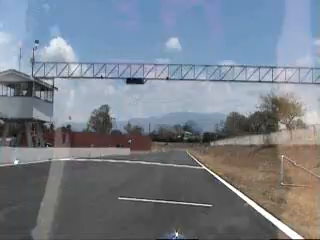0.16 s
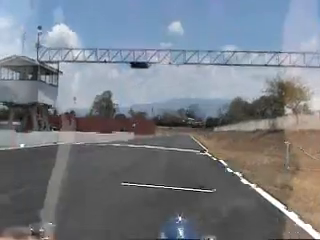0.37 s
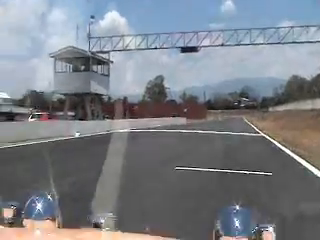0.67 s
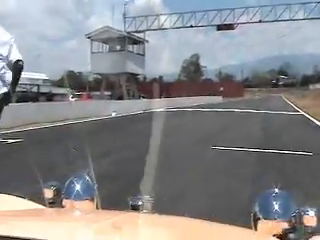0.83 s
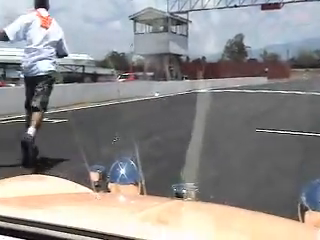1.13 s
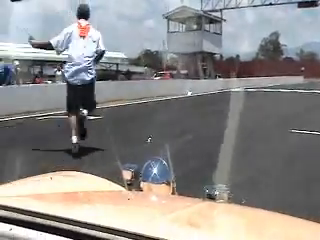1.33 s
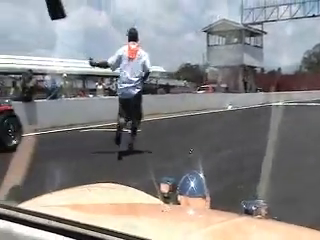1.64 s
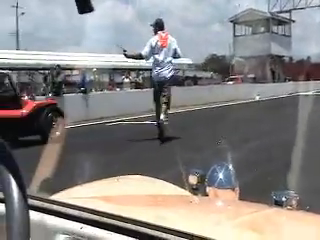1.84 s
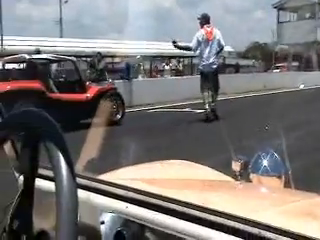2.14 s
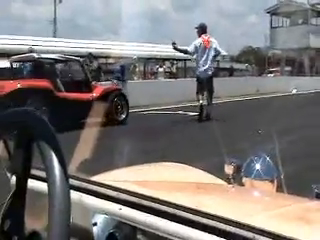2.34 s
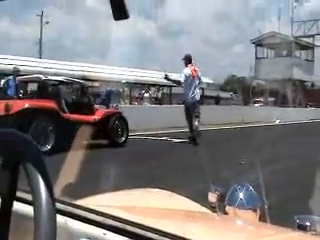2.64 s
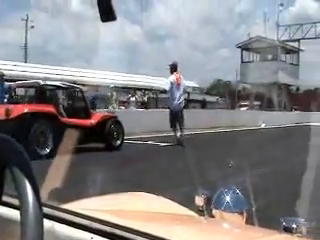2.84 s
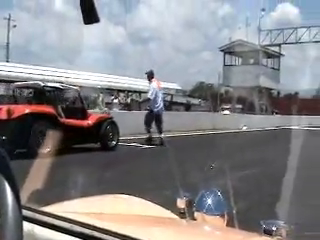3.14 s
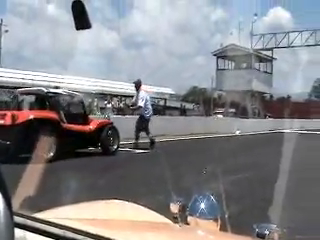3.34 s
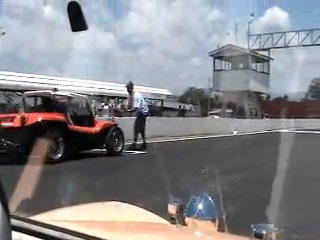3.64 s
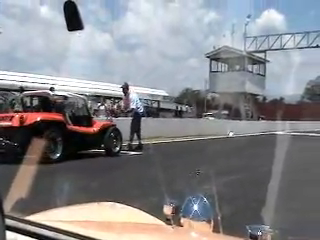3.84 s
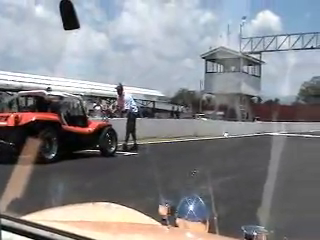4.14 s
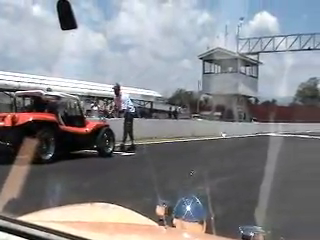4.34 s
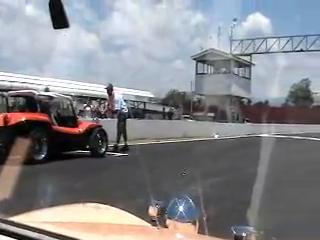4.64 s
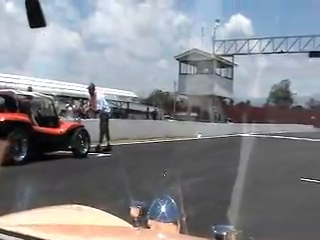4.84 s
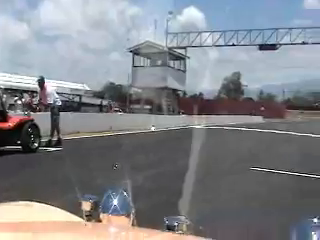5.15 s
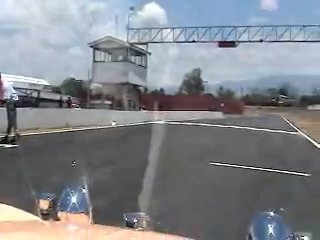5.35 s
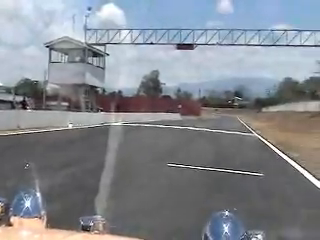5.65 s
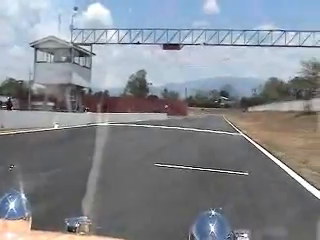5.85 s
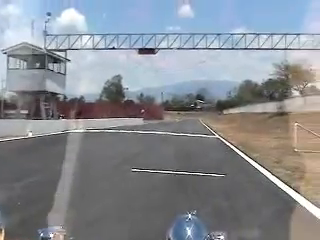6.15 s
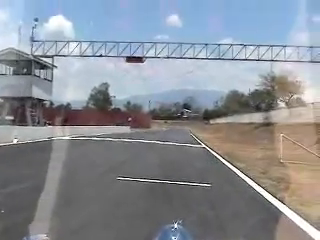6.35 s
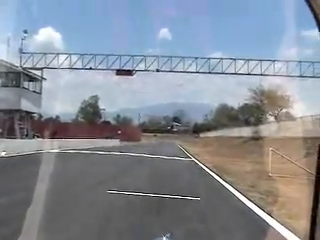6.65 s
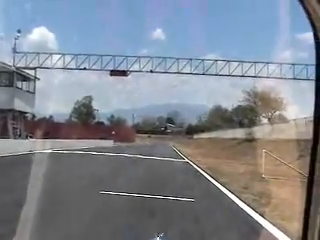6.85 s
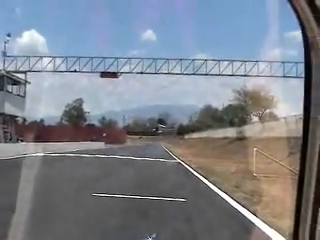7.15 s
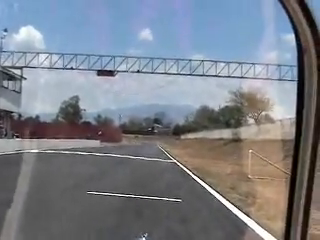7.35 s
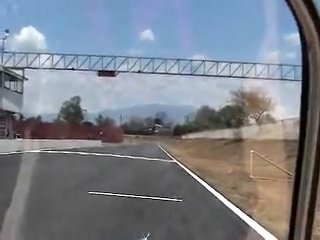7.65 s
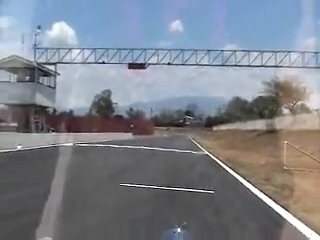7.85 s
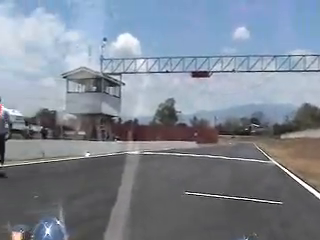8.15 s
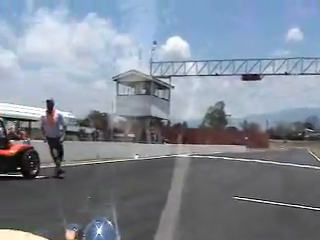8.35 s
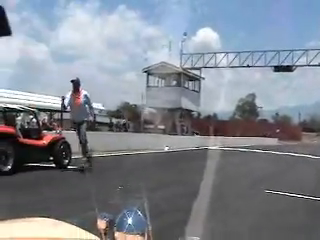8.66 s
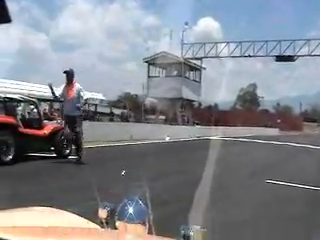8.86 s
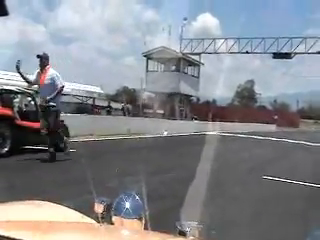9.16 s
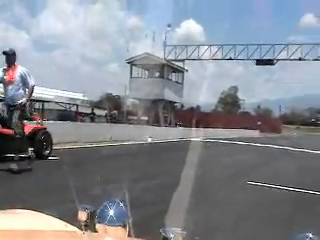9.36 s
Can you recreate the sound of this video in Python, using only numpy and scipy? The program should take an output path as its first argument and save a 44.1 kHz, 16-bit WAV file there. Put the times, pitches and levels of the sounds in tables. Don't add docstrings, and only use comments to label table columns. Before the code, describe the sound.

Close stereo microphones in an open buggy pick up a lumpy, low idle with alternating loud and soft exhaust beats, metallic ringing, light ticking and airy tin rattle. Low wind and a faint second engine throb lie beneath. The opening is silent; the idle then holds steady until one short, loud rev with crackling pops, followed by a falling whine and slowing engine.

```python
import sys
import numpy as np
from scipy import signal
from scipy.fft import rfft, irfft, next_fast_len
from scipy.io import wavfile
from scipy.ndimage import map_coordinates

SR = 44100
rng = np.random.default_rng(int(sys.argv[2]) if len(sys.argv) > 2 else 0)


def boost_factor(decibels):
    exponent = np.asarray(decibels, float) / 20
    return 10 ** exponent


def master_out(mix):
    frames = np.transpose(np.atleast_2d(mix))
    ceiling = np.clip(frames, -1, 1)
    pcm = np.round(ceiling * 32767).astype(np.int16)
    wavfile.write(sys.argv[1], SR, pcm)


N = 418709

IDLE_HZ, REV_SPAN_HZ = 16.85, 5.5
OPEN_S, OPENING_S, SHUT_S, SHUTTING_S = 8.325, 0.05, 8.505, 0.03


def unit(x):
    return x / np.sqrt(np.mean(x ** 2) + 1e-20)


def along(points, hz):
    f, v = np.transpose(points)
    return np.interp(np.log(hz + 1), np.log(f + 1), v)


def wobble(rate):
    knots = rng.standard_normal(int(N * rate / SR) + 4)
    return map_coordinates(knots, [np.arange(N) * rate / SR])


def filtered(x, response):
    m = next_fast_len(N + SR // 2)
    return irfft(rfft(x, m) * response(np.fft.rfftfreq(m, 1 / SR)), m)[..., :N]


def pipe(modes):
    def response(f):
        total = 0
        for k, (centre, width, db) in enumerate(modes):
            damping = 1j * f * width
            total = total + (-1) ** k * boost_factor(db) * damping / (centre * centre - f * f + damping)
        return total
    return response


def level(throttle, fast, idle_db, open_db, speed_db):
    return boost_factor(idle_db + open_db * throttle + speed_db * fast)


def once_a_cycle(turns, place, late_s, scatter_db):
    cycles = 250
    luck = rng.standard_normal((cycles, 2))
    at = np.interp(np.arange(cycles) + place, turns, np.arange(N), right=N + SR)
    near = np.minimum(at, N - 1).astype(int)
    at = np.clip(at + SR * late_s[near] * luck[:, 0], 0, N)
    size = boost_factor(scatter_db[near] * luck[:, 1])
    whole = at.astype(int)
    part = at - whole
    first = np.bincount(whole, size * (1 - part), N + 2)
    second = np.bincount(whole + 1, size * part, N + 2)
    return (first + second)[:N]


def burst(impulses, length_s):
    return signal.lfilter([1], [1, -np.exp(-1 / (SR * length_s))], impulses)


def rattle(turns, channels):
    memory = 18
    steps = int(SR / IDLE_HZ)
    takes = rng.standard_normal((channels, 12, steps))
    age = np.clip(turns, 0, None) / memory
    place = (turns % 1 * steps).astype(int)
    old = age.astype(int)
    fade = age % 1 * np.pi / 2
    return np.cos(fade) * takes[:, old, place] + np.sin(fade) * takes[:, old + 1, place]


# (time [s], four-stroke cycles per second [Hz])
ENGINE_SPEED = [(0.8, 17.004), (1.6, 16.904), (2.4, 16.901), (3.3, 16.861), (4.0, 16.739), (4.8, 16.862),
                (5.5, 16.629), (6.4, 16.651), (7.1, 16.443), (7.8, 16.079), (8.33, 16.128), (8.41, 18.872),
                (8.5, 22.763), (8.57, 21.703), (8.7, 19.902), (8.9, 18.974), (9.2, 17.067), (9.49, 16.529)]


def controls():
    t = np.arange(N) / SR
    times, rates = np.transpose(ENGINE_SPEED)
    rate = np.interp(t, times, rates)
    turns = np.cumsum(rate) / SR - 12.006 + 0.0012 * wobble(9)
    opening = np.clip((t - OPEN_S) / OPENING_S, 0, 1)
    throttle = opening * np.exp(-np.clip(t - SHUT_S, 0, None) / SHUTTING_S)
    return turns, throttle, np.clip((rate - IDLE_HZ) / REV_SPAN_HZ, 0, 1)


# (place in the cycle [0-1], bark level [dB], puff level [dB])
CYLINDER_FIRINGS = [
    (.216, 0, 0),
    (.427, 17.3, 1),
    (.716, -.2, -2),
    (.929, 16.8, -1),
]
# (frequency [Hz], width [Hz], level [dB])
FIRST_BANK = [(67, 111, 2.7), (130, 25, -3.6), (180, 25, -6.1), (285, 74, 2.4), (293, 25, 7.9),
              (491, 68, -9.3), (530, 54, 1.0), (532, 25, 1.1)]
# (frequency [Hz], width [Hz], level [dB])
SECOND_BANK = [(43, 74, -16.4), (108, 25, -16.3), (319, 52, -1.0), (316, 90, -9.0), (341, 25, -2.9),
               (335, 40, -0.2), (473, 25, -27.0), (576, 25, -33.2)]
# (frequency [Hz], width [Hz], level [dB])
TAIL_PIPE = [(211, 8.1, -5.5), (344.6, 31.4, -8), (457, 16, -9), (623.2, 10, 4.5), (672, 12, -2),
             (860, 22.5, -13), (931, 34, -17), (1228, 34, -15)]
# (frequency [Hz], width [Hz], level [dB])
TIN_SHROUD = [(716, 14, 0)]
# (frequency [Hz], width [Hz], level [dB])
BANK_COLLECTOR = [(226.7, 29, 7), (374, 52, -7), (151, 46, -5.5)]


def exhaust(turns, throttle, fast):
    rough = 0.04 + 0.35 * fast
    off_idle = np.clip(fast / 0.3, 0, 1)
    steady = IDLE_HZ * np.arange(N) / SR
    calm = 0.04 * np.ones(N)
    joint = 0.075

    def keep_step(x):
        return np.interp(turns / IDLE_HZ * SR, np.arange(N), x)

    def silencer(hz):
        return 1 / (1 + (86 / (hz + 1)) ** 12) / (1 + (hz / 560) ** 12)

    def banks(hz):
        return silencer(hz) * np.array([pipe(FIRST_BANK)(hz), pipe(SECOND_BANK)(hz)])

    fire = [once_a_cycle(steady, place, 0.0008 * calm, 6 * calm) for place, _, _ in CYLINDER_FIRINGS]
    blows = [boost_factor(bark_db) * p for (_, bark_db, _), p in zip(CYLINDER_FIRINGS, fire)]
    bark = filtered(np.array([blows[0] + blows[2], blows[1] + blows[3]]), banks).sum(axis=0)

    leak = once_a_cycle(steady, joint, 0.0017 * calm, 9 * calm)
    ring = unit(keep_step(filtered(leak, pipe(TAIL_PIPE))))
    ring = filtered(ring, lambda hz: 0.25 + 0.75 / (1 + (hz / 760) ** 30))
    leak = once_a_cycle(turns, joint, 0.001 * rough, 9 * rough)
    ring = ring + boost_factor(-4) * unit(filtered(leak, pipe(TIN_SHROUD)))

    firings = sum(once_a_cycle(turns, k / 4, 0.0008 * rough, 6 * rough) for k in range(4))
    even = filtered(firings, lambda hz: -pipe(BANK_COLLECTOR)(hz) / (1 + 1j * hz / 600) ** 2)

    puffs = sum(boost_factor(puff_db) * p for (_, _, puff_db), p in zip(CYLINDER_FIRINGS, fire))
    puffs = keep_step(burst(puffs, 0.0074))
    boom = np.sqrt(2) * np.cos(2 * np.pi * 4 * (turns + 0.06)) * boost_factor(0.37 * wobble(13))

    out = level(throttle, fast, -16.9, 3, 2.5) * boom
    out = out + level(throttle, fast, -14.5, 3.1, -13) * unit(keep_step(bark))
    out = out + level(throttle, fast, -25, 0, -12) * boost_factor(6 * off_idle) * ring
    out = out + level(throttle, fast, -43, 7, -8) * boost_factor(27 * off_idle) * unit(even)
    return out, puffs


# (time [s], peak level [dB], time to fall 60 dB [s])
PIPE_CRACKS = [
    (8.3088, -19.5, 0.029),
    (8.37, -9.5, 0.053),
    (8.3832, -7, 0.045),
    (8.469, 2, 0.03),
    (8.4766, -3.5, 0.035),
    (8.4871, -11, 0.022),
    (8.516, -6, 0.013),
    (8.8192, -21.5, 0.13),
]
# (frequency [Hz], level [dB])
CRACK_COLOUR = [(290, -17), (500, -3), (703, -11), (989, -1), (1370, -6.5), (1910, -8), (6410, -24),
                (8300, -40.5), (10800, -72), (18300, -120)]
# (time [s], level [dB], frequency [Hz], time to fall 60 dB [s])
PANEL_KNOCK = [
    (5.977, -10.5, 1350, 0.026),
]


def spits():
    out = np.zeros(N + SR)
    t = np.arange(SR // 5) / SR
    for s, db, t60 in PIPE_CRACKS:
        out[round(s * SR):][:len(t)] += boost_factor(db + 8.5 - 60 * t / t60) * rng.standard_normal(len(t))
    out = filtered(out[:N], lambda hz: boost_factor(along(CRACK_COLOUR, hz)))
    for s, db, hz, t60 in PANEL_KNOCK:
        onset = 1 - np.exp(-t / 0.0016)
        out[round(s * SR):][:len(t)] += boost_factor(db - 60 * t / t60) * np.sin(2 * np.pi * hz * t) * onset
    return out


# (frequency [Hz], level [dB])
RUSH_COLOUR = [(60, -25.5), (100, -15), (400, -13), (550, -20.5), (700, -15), (790, -18), (1070, -26),
               (1480, -30), (2990, -33), (3300, -37.5), (5000, -46.5), (7130, -52), (8300, -50.5),
               (10800, -120)]
# (frequency [Hz], share [0-1])
RETURNING_SHARE = [(100, .65), (500, .85), (900, .85), (1200, .7), (1800, .6), (3100, .6), (4200, .15),
                   (8000, .05)]
# (frequency [Hz], likeness [0-1])
STEREO_LIKENESS = [(60, 0.98), (140, 1.0), (310, 0.8), (700, 0.87), (1590, 0.68), (3620, 0.86), (8220, 1)]


def rush(turns, puffs):
    swell = (2.5 + unit(puffs) * 0.12) * boost_factor(0.24 * wobble(25))
    air = rng.standard_normal((2, N)) * swell
    tin = rattle(turns, channels=2) * swell
    pair = filtered(air, lambda hz: np.sqrt(1 - along(RETURNING_SHARE, hz)))
    pair = pair + filtered(tin, lambda hz: np.sqrt(along(RETURNING_SHARE, hz)))

    def spread(hz):
        angle = np.arccos(np.clip(along(STEREO_LIKENESS, hz), -1, 1)) / 2
        return boost_factor(along(RUSH_COLOUR, hz)) * np.array([np.cos(angle), np.sin(angle)])

    mid, side = filtered(pair, spread)
    treble = np.sqrt(np.mean(filtered(mid, lambda hz: hz > 1000) ** 2))
    return np.array([mid + side, mid - side]) / treble


# (place in the cycle [0-1], frequency [Hz], width [Hz], burst length [s], level [dB])
VALVE_TICKS = [(.41, 1230, 90, .0016, -11), (.16, 1400, 250, .002, -13), (.58, 3020, 90, .004, -14),
               (.31, 3020, 120, .004, -15), (.04, 2600, 120, .0015, -17), (.95, 1720, 60, .003, -11),
               (0, 880, 120, .003, -12), (.15, 2700, 500, .002, -17)]


def valves(turns):
    still = np.ones(N)
    grit = rattle(turns, channels=1)[0] + 0.35 * rng.standard_normal(N)
    out = np.zeros(N)
    for place, hz, width, length_s, db in VALVE_TICKS:
        tick = burst(once_a_cycle(turns, place, 0 * still, 0.88 * still), length_s) * grit
        for w in (4 * width, width):
            tick = signal.lfilter(*signal.iirpeak(hz, hz / w, SR), tick)
        out += boost_factor(db) * unit(tick)
    return out


def fan(turns, fast):
    blades, rise_s = 60, 0.07
    rise = np.clip((np.arange(N) / SR - SHUT_S) / rise_s, 0, 1) ** 2
    slowed_hz = np.clip(20 - IDLE_HZ - REV_SPAN_HZ * fast, 0, None)
    angle = 2 * np.pi * blades * turns + 0.6 * wobble(50)
    tone = np.sin(angle) + boost_factor(-14) * np.sin(2 * angle)
    return rise * boost_factor(-28.5 - 8 * slowed_hz + 2.5 * wobble(30)) * tone


def wind(throttle, fast):
    low = filtered(rng.standard_normal(N), lambda hz: (hz / 30) ** 2 / (1 + (hz / 36) ** 6))
    throb = filtered(rng.standard_normal(N), lambda hz: pipe([(50.5, 5, 0)])(hz) ** 2)
    gusts = boost_factor(1.5 * wobble(5.3) + 1.5 * wobble(4.2))
    return level(throttle, np.sqrt(fast), -50, 1.5, 16) * gusts * unit(low) + boost_factor(-34) * unit(throb)


# (frequency [Hz], level [dB])
LEFT_OVER_RIGHT = [(60, 0.0), (110, 0.0), (210, -1.1), (380, -1.7), (700, -3), (1300, 0.77), (2400, 0.0),
                   (4440, 0.48), (8220, 0.0)]
# (frequency [Hz], phase [rad])
LEFT_RIGHT_PHASE = [(0, 0), (2240, 0.048), (2500, 0), (3100, 0.99), (4220, 0), (8350, 0)]


def scene():
    turns, throttle, fast = controls()
    pipes, puffs = exhaust(turns, throttle, fast)
    direct = pipes + spits() + fan(turns, fast) + wind(throttle, fast)
    direct = direct + level(throttle, fast, -33, 1, 2) * valves(turns)

    def port(hz, side):
        return boost_factor(along(LEFT_OVER_RIGHT, hz) / 2 * side) * np.exp(0.5j * along(LEFT_RIGHT_PHASE, hz) * side)

    stereo = filtered(direct, lambda hz: 0.91 * np.array([port(hz, 1), port(hz, -1)]))
    return stereo + boost_factor(-2.0) * level(throttle, fast, -31, 7.5, 3) * rush(turns, puffs)


def roll_off(x):
    return signal.sosfilt(signal.butter(12, 8820, fs=SR, output="sos"), x)


def record(dry):
    start_s, fade_s = 0.7995, 0.00061
    x = filtered(dry + 0.008, lambda hz: 1 / (1 + (hz / 7656) ** 40))
    x = x * np.clip((np.arange(N) / SR - start_s) / fade_s, 0, 1)
    x = x / (1 + abs(x / 1.02) ** 8) ** (1 / 8)
    return roll_off(x)


dry = scene()
out = record(dry)
master_out(out)
```